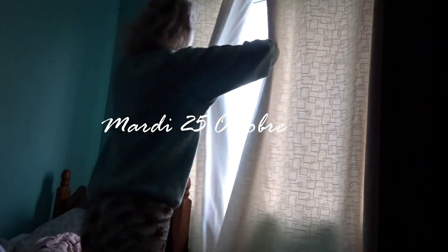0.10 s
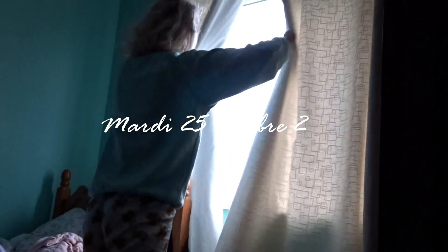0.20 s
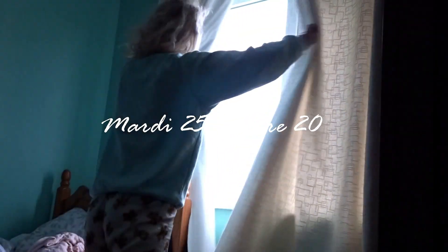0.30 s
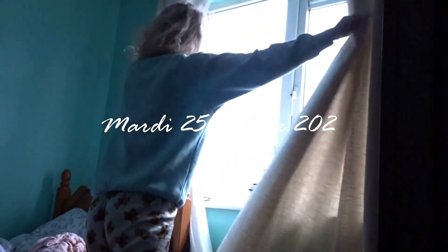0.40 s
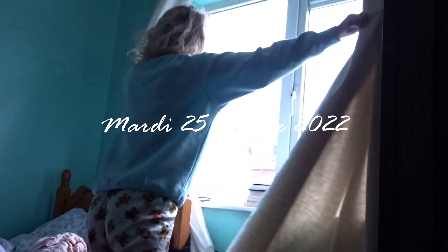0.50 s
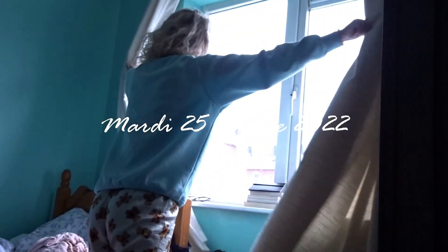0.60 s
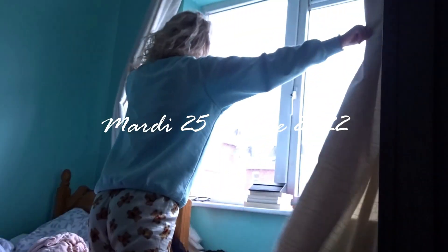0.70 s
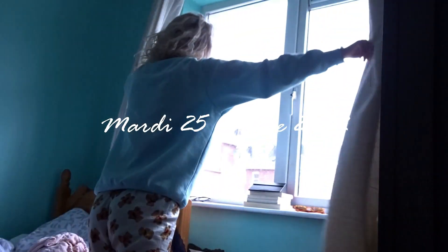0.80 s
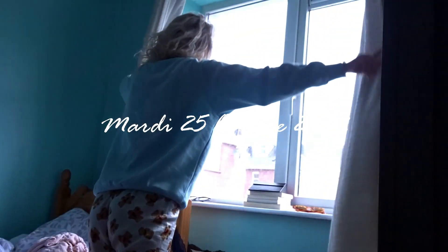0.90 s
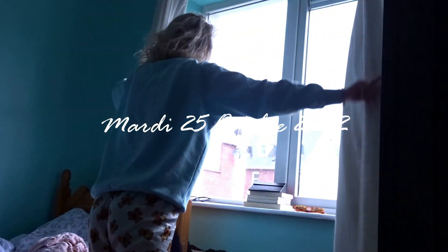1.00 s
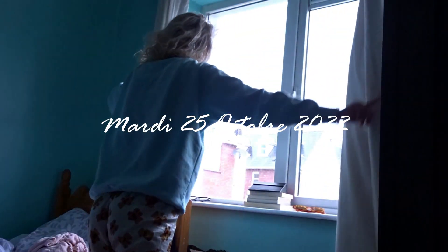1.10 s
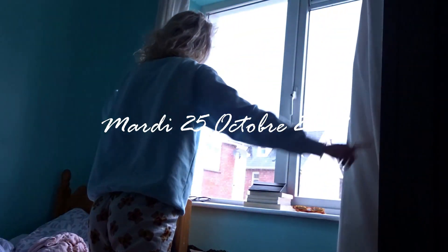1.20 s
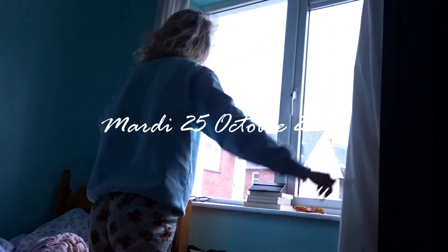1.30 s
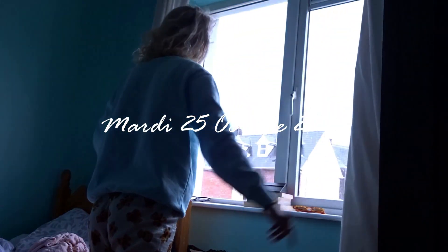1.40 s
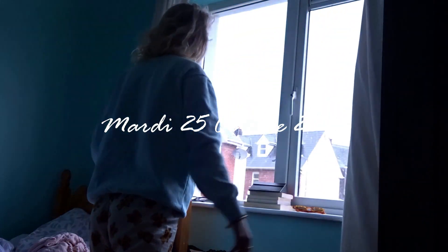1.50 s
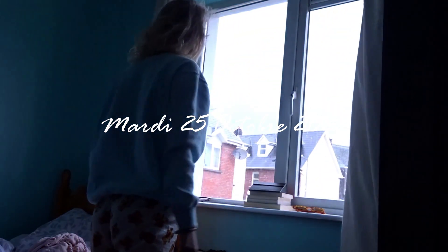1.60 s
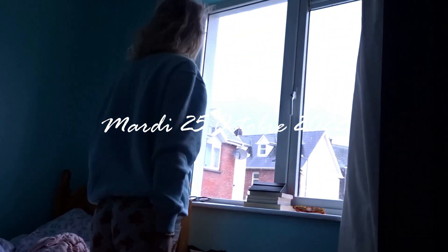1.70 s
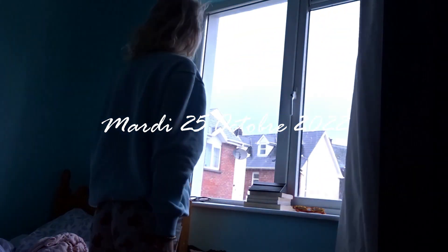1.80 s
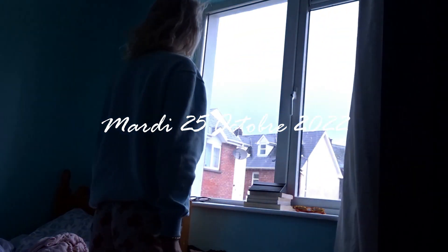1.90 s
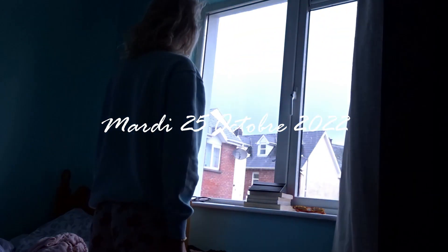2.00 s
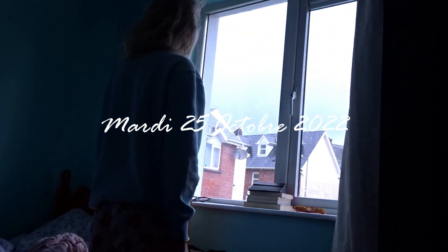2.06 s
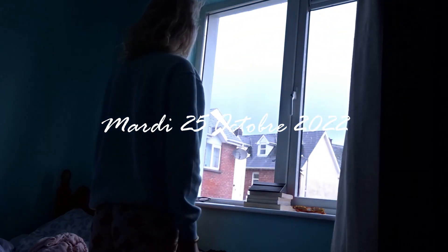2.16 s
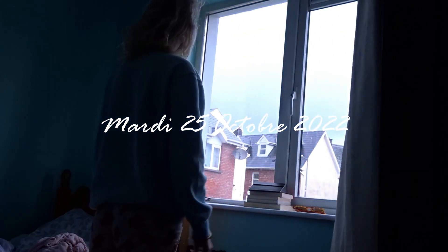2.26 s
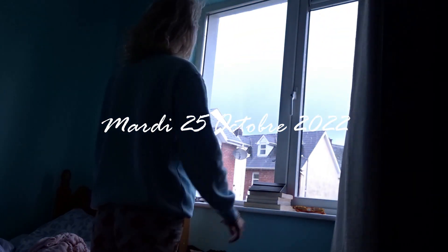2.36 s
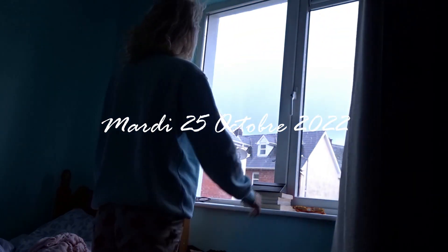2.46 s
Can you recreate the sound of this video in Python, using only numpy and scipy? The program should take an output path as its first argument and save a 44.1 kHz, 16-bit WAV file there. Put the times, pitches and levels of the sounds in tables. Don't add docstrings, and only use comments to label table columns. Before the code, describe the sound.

Curtains swept open along a pole, rings scraping and rattling, then quiet bedroom hush

```python
import sys
import numpy as np
from scipy import signal
from scipy.fft import rfft, irfft
from scipy.io import wavfile

SR = 44100
rng = np.random.default_rng(int(sys.argv[2]) if len(sys.argv) > 2 else 0)


def wav_record(signal):
    frames = np.transpose(np.atleast_2d(signal))
    bounded = np.clip(frames, -1, 1)
    quanta = np.round(bounded * 32767).astype(np.int16)
    wavfile.write(sys.argv[1], SR, quanta)


def invert_db(level):
    return 10 ** (np.asarray(level, dtype=float) / 20)


N = 110250

# (time [s], scrape level [dB], extra ring chatter from dragging [dB])
SWEEP = [
    (0, -68, 0.5),
    (.15, -51.5, 12.5),
    (.2, -45, 19.5),
    (.31, -24.5, 0),
    (.345, -22, 1.5),
    (.55, -22, 3.4),
    (.7, -62.5, 7.5),
    (1.15, -74.5, 7),
    (1.25, -87, 2.5),
]
# (time [s], level [dB], rattle held [s], favoured pitch [Hz], pitch spread [octaves])
POLE_KNOCKS = [(.01, -54, 0.11, 345, 1.34), (.072, -39, 0.048, 640, 0.57), (.163, -40, 0.056, 800, 1.9),
               (.2, -43, .08, 610, 0.074), (.229, -36.5, 0.037, 1050, 0.17), (.243, -33.5, .03, 610, 0.1),
               (.324, -26, 0.0067, 700, 0.54), (.368, -21.5, 0.045, 620, 0.7),
               (.43, -28.5, 0.035, 256, 0.39), (.47, -19.5, 0.013, 900, 0.83), (.54, -20, 0.017, 520, 0.52),
               (.622, -23.5, 0.0073, 911, 0.17), (.64, -35, 0.032, 354, 1.3), (.72, -40.5, .045, 800, 1.7),
               (.836, -44.5, 0.035, 895, 1.5), (.963, -47.5, 0.04, 597, 0.11),
               (1.052, -45, 0.055, 860, 0.98), (0.889, -54, 0.12, 1190, 1.9),
               (1.27, -56.5, 0.055, 770, 0.94), (1.179, -57.5, 0.26, 290, 0.31),
               (1.604, -60.5, .1, 900, 1.45), (1.63, -58.5, 0.19, 130, .3), (2.43, -56.5, .04, 394, 0.75),
               (2.474, -54, 0.027, 700, 1.4)]
KNOCK_T60_S, FIRST_TOUCH_DB = 0.2, 24.5


def in_time(rows):
    s, *columns = np.transpose(rows)
    t = np.arange(N) / SR
    return [np.interp(t, s, column) for column in columns]


def at_hz(points, hz):
    points_hz, values = np.transpose(points)
    return np.interp(np.log(hz + 1), np.log(points_hz), values)


def rms_one(x):
    return x / np.sqrt(np.mean(x ** 2) + 1e-20)


def colour(x, points):
    size = x.shape[-1]
    hz = np.arange(size // 2 + 1) * SR / size
    return irfft(rfft(x) * invert_db(at_hz(points, hz)), size)


def drift(rate_hz):
    r = np.exp(-2 * np.pi * rate_hz / SR)
    noise = rng.standard_normal(N + SR)
    return rms_one(signal.lfilter([1], [1, -2 * r, r * r], noise)[SR:])


def clicks(per_s, spread_db):
    size = invert_db(spread_db * np.minimum(rng.exponential(1, N), 4)) * rng.choice([-1, 1], N)
    contact = rng.random(N) < per_s / SR
    return rms_one(size * contact + 1e-9)


def resonate(x, hz, width_hz):
    r = np.exp(-np.pi * width_hz / SR)
    poles = [1, -2 * r * np.cos(2 * np.pi * hz / SR), r * r]
    return np.sqrt((1 - r * r) / 2) * signal.lfilter([1, 0, -1], poles, x)


def burst(start_s, db, t60_s, hold_s=0):
    t = np.arange(N) / SR - start_s
    return invert_db(db - 60 * np.maximum(t - hold_s, 0) / max(t60_s, 0.005)) * (t >= 0)


def hush():
    # (frequency [Hz], level per Hz [dB])
    hush_colour = [(15, -44.5), (25, -15), (263, -4), (476, -4.5), (531, 0.5), (659, -9), (2280, -13),
                   (10700, -24.5), (16000, -30.5)]
    # (frequency [Hz], level [dB])
    hush_side = [(60, -12), (240, -7), (950, 0.5), (3770, 1), (15000, 0)]
    hush_db, hollow_db, hollow_hz, hollow_width_hz = -60, -24, 550, 20
    mid, side = colour(rng.standard_normal((2, N)), hush_colour)
    scale = invert_db(hush_db + drift(6) / 2) / np.std(mid)
    hollow_level = invert_db(hush_db + hollow_db + 3 * drift(10))
    hollow = hollow_level * resonate(rng.standard_normal(N), hollow_hz, hollow_width_hz)
    return np.array([mid * scale + hollow, colour(side, hush_side) * scale])


def bedroom(x):
    # (frequency [Hz], t60 [s])
    decay = [(150, 0.18), (1000, 0.31), (4000, 0.19), (12000, 0.076)]
    # (frequency [Hz], level [dB])
    side_colour = [(60, -13), (180, -17.5), (550, -11.5), (1650, -7), (4970, -1.5), (15000, -0.5)]
    room_db, scatter_t60_s, wander_hz, wander_rad = -7, 0.015, 20, 3.27
    t = np.arange(SR // 2) / SR
    tail = 0
    for hz in 63 * 2. ** np.arange(8):
        octave = signal.butter(2, [hz, 2 * hz], "band", fs=SR, output="sos")
        band = signal.sosfilt(octave, rng.standard_normal((2, len(t))))
        t60_s = at_hz(decay, 1.4 * hz)
        unit_energy = np.sqrt(2 * np.log(1000) / t60_s / SR)
        tail = tail + band * invert_db(-60 * t / t60_s) * (t > 0.004) * unit_energy
    scatter = rng.standard_normal(len(t)) * invert_db(-60 * t / scatter_t60_s)
    direct = [t == 0, scatter / np.sqrt(np.sum(scatter ** 2))]
    answer = invert_db(room_db) * tail + direct
    mid, side = signal.fftconvolve(x[None], answer, axes=1)[:, :N] / np.sqrt(1 + invert_db(2 * room_db))
    side = np.real(signal.hilbert(side) * np.exp(1j * wander_rad * drift(wander_hz)))
    return np.array([mid, colour(side, side_colour)])


def cloth():
    cloth_db, cut_hz = -3.5, 4600
    width_per_octave = 0.52
    grain = clicks(3000, 3.5)
    starts = (np.array(POLE_KNOCKS)[:, 0] * SR).astype(int) + 2
    grain[starts] = invert_db(FIRST_TOUCH_DB - 6.5)
    flaps = 0
    for s, db, hold_s, hz, spread in POLE_KNOCKS:
        flap = grain * burst(s, db, KNOCK_T60_S, hold_s)
        flaps = flaps + min(spread, 1) ** 2 * resonate(flap, hz, width_per_octave * spread * hz)
    return invert_db(cloth_db) * signal.lfilter(*signal.butter(2, cut_hz, fs=SR), flaps)


def pole():
    # (frequency [Hz], width [Hz], level [dB])
    pole_modes = [(80, 30, -11), (130, 25, -2.5), (211.7, 39, -5.5), (290, 20, 0.5), (368, 23, -5.5),
                  (519, 32, -4), (597, 25, -2), (700, 150, -10.5), (800, 59, -7), (956, 40, -2.5),
                  (1090.4, 40, 0.5), (1323, 120, -13), (1632, 230, -4.5), (2020, 83, -8.5)]
    rattle_per_s, rattle_spread_db, pole_db, under_sweep_db = 1100, 4.5, -9, -23.5
    touches = np.array([clicks(rattle_per_s, rattle_spread_db) for _ in range(3)])
    s, _, _, pitch_hz, spread = np.transpose(POLE_KNOCKS)
    touches[:, (s * SR).astype(int) + 2] = invert_db(FIRST_TOUCH_DB)
    knock_power = np.array([burst(s, db, KNOCK_T60_S, hold_s) ** 2 for s, db, hold_s, _, _ in POLE_KNOCKS])
    sweep_power = invert_db(in_time(SWEEP)[0] + under_sweep_db) ** 2
    out = 0
    for k, (hz, width_hz, db) in enumerate(pole_modes):
        share = np.exp(-(np.log2(hz / pitch_hz) / spread) ** 2) / spread
        force = np.sqrt(share @ knock_power + sweep_power)
        out = out + invert_db(db) * resonate(touches[k % 3] * force, hz, width_hz)
    return invert_db(pole_db) * out


def rings():
    # (time [s], level [dB], t60 [s], chatter [dB], favoured pitch [Hz])
    snags = [(0.051, -56, 0.21, 8, 2230), (.075, -64, 0.32, 15.5, 2308), (.161, -30, 0.21, 4, 2700),
             (.22, -38.5, 0.97, 9, 2800), (0.255, -37, 0.12, 12, 2800), (.325, -11, 0.083, 2, 2850),
             (.364, -16, 0.22, 6, 2500), (.43, -14.5, 0.31, 0.8, 3300), (.445, -21, 0.37, 2, 4780),
             (.465, -11.5, 0.16, 0.5, 3787), (0.509, -26, .2, 5, 4914), (.535, -12.5, 0.04, -2, 3016),
             (0.542, -26, 0.23, 8.5, 2600), (.594, -42, 0.09, 5.5, 2500), (.79, -58, .4, 9, 3000),
             (1.6, -77, .5, .1, 2000), (1.68, -63.5, 1, 2, 4000), (2.039, -67, 1, -3.3, 5000)]
    # (frequency [Hz], width [Hz], level [dB])
    ring_modes = [(1870, 270, -1.5), (2270, 120, -2), (2439, 45, -1.5), (2709, 100, 1), (2927, 100, -1.5),
                  (3250, 140, -2.5), (3730, 80, -7), (4510, 120, -10), (5680, 200, -12.5), (6370, 200, -8),
                  (7280, 120, -9), (8200, 190, -3.5), (10800, 400, -9), (11170, 300, -5.5)]
    # (frequency [Hz], level per Hz [dB])
    scrape_colour = [(35, -66), (60, -36), (354, -7.5), (593, -9), (1310, -3.5), (2650, -20.5), (4320, -4),
                     (12100, -9), (16000, -10.5)]
    # (time struck [s], frequency [Hz], level [dB], t60 [s])
    free_ring = (.56, 8005, -45, .62)
    scrape_db, scrape_per_s, scrape_spread_db = -0.5, 12000, 2.9
    rings_db, chatter_per_s, chatter_spread_db = -7.5, 900, 3
    drag_hz, near_octaves = 2800, 0.29

    snag_power = np.array([burst(s, db, t60_s) ** 2 for s, db, t60_s, _, _ in snags])
    sweep_db, drag_db = in_time(SWEEP)
    scrape = rms_one(colour(clicks(scrape_per_s, scrape_spread_db), scrape_colour))
    scrape = scrape * invert_db(scrape_db + 0.8 * drift(25))
    out = scrape * np.sqrt(invert_db(sweep_db) ** 2 + snag_power.sum(axis=0))

    touches = [clicks(chatter_per_s, chatter_spread_db) for _ in range(3)]
    _, _, _, chatter_db, pitch_hz = np.transpose(snags)
    for k, (hz, width_hz, db) in enumerate(ring_modes):
        near = np.exp(-(np.log2(hz / np.append(pitch_hz, drag_hz)) / near_octaves) ** 2)
        drag_power = invert_db(sweep_db + drag_db * near[-1]) ** 2
        chatter_power = (invert_db(2 * chatter_db) * (0.22 + near[:-1])) @ snag_power
        force = np.sqrt(drag_power + chatter_power)
        level = invert_db(rings_db + db + 2 * drift(6.7))
        out = out + level * resonate(touches[k % 3] * force, hz, 1.3 * width_hz)

    s, hz, db, t60_s = free_ring
    tone = np.sin(2 * np.pi * hz * np.arange(N) / SR)
    return out + burst(s, db, t60_s) * tone * invert_db(2.5 * drift(25))


def scene():
    curtains = signal.lfilter(*signal.butter(2, 50, "high", fs=SR), rings() + pole() + cloth())
    mid, side = bedroom(curtains) + hush()
    return np.array([mid + side, mid - side])


def top_cut(x):
    return signal.sosfilt(signal.butter(12, 16860, fs=SR, output="sos"), x)


def record(dry):
    low_pass = signal.cheby2(12, 70, 16000 * 1.03, fs=SR, output="sos")
    rounded = 0.95 * np.tanh(dry / 0.95)
    return top_cut(signal.sosfilt(low_pass, rounded))


dry = scene()
out = record(dry)
wav_record(out)
```